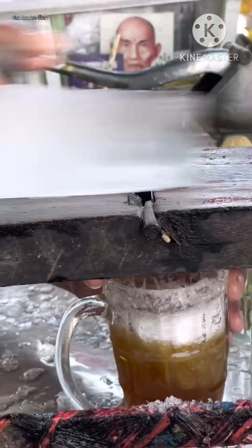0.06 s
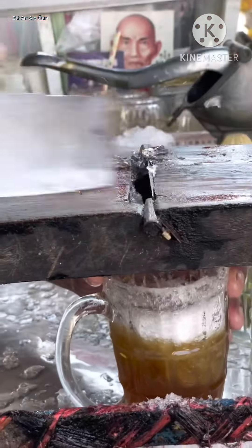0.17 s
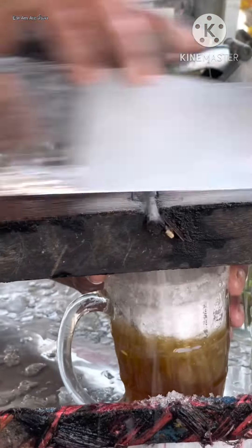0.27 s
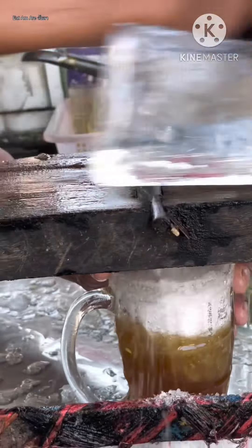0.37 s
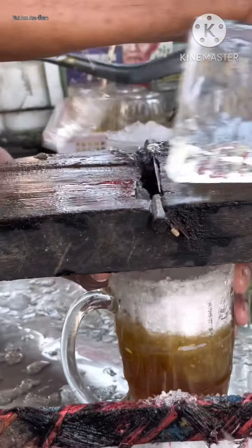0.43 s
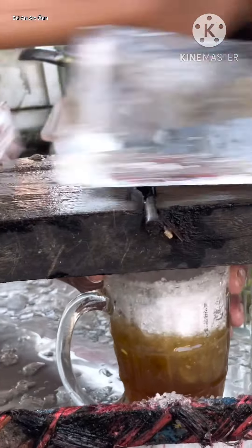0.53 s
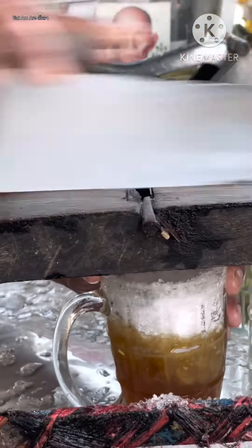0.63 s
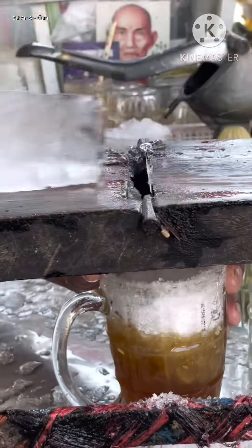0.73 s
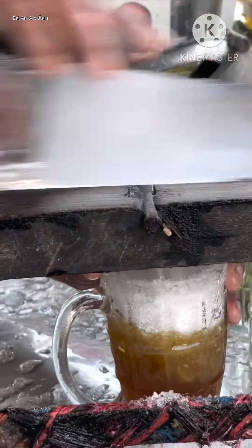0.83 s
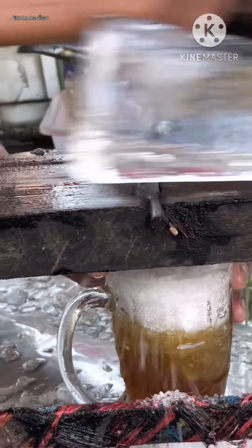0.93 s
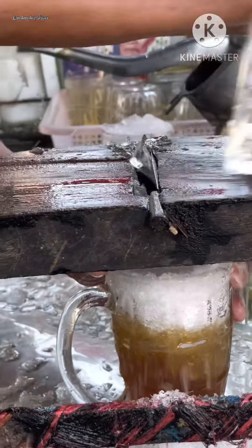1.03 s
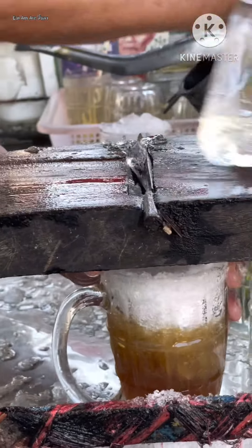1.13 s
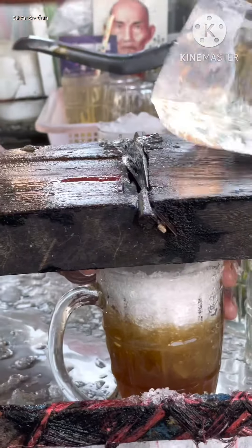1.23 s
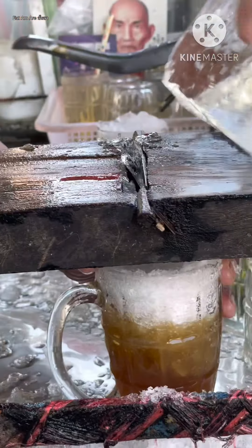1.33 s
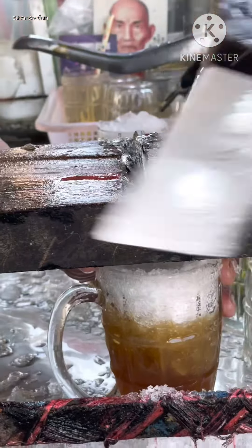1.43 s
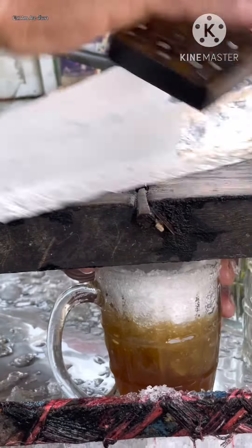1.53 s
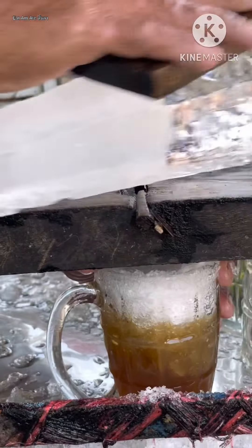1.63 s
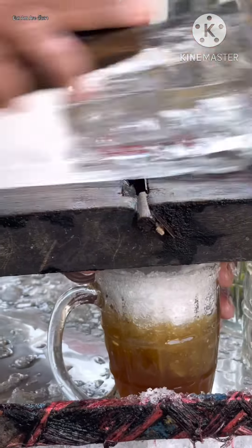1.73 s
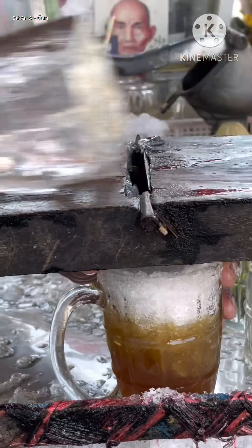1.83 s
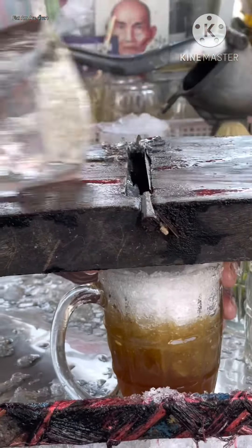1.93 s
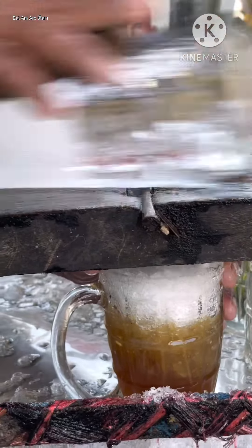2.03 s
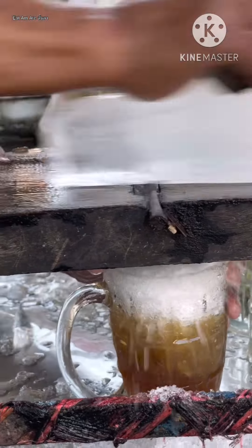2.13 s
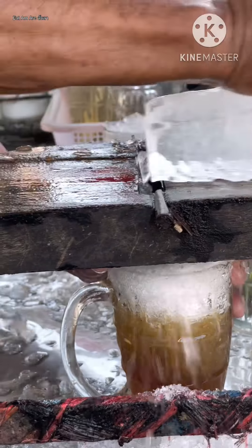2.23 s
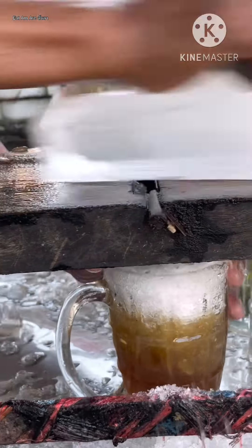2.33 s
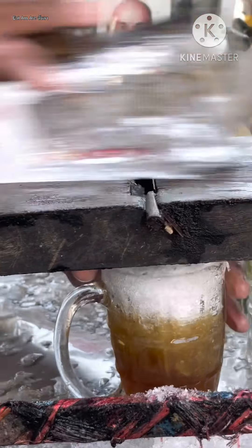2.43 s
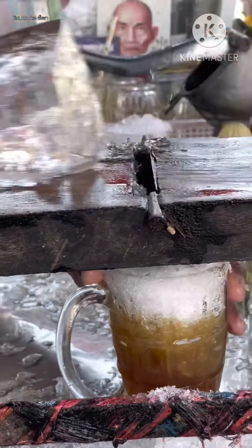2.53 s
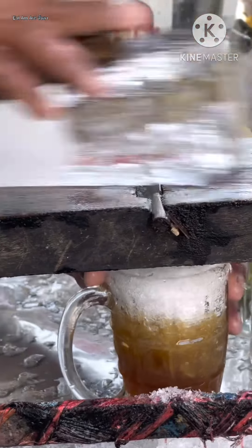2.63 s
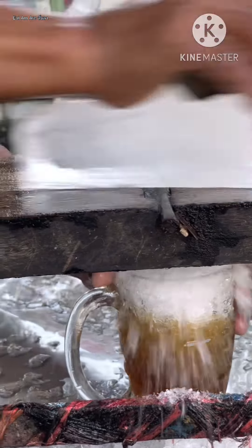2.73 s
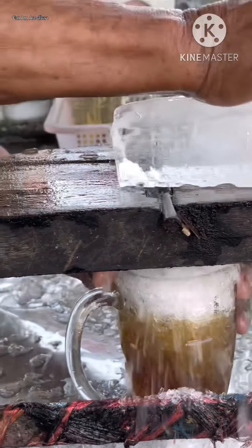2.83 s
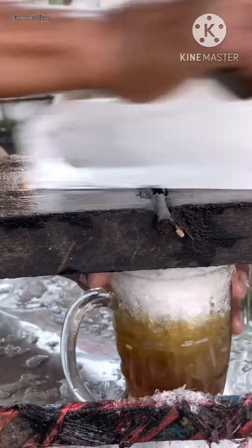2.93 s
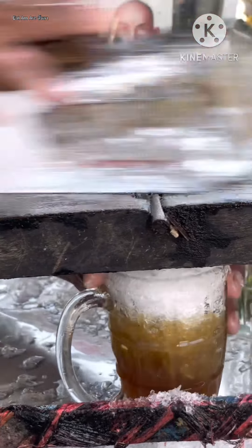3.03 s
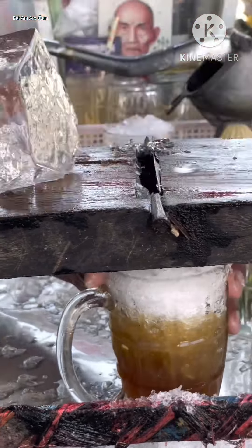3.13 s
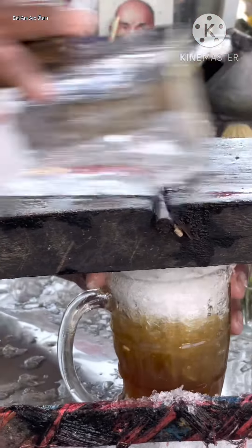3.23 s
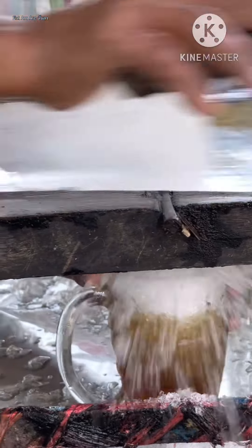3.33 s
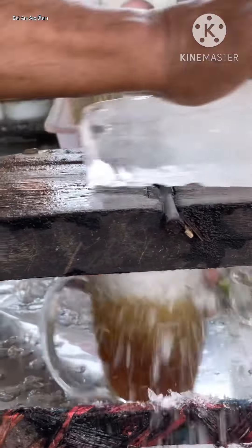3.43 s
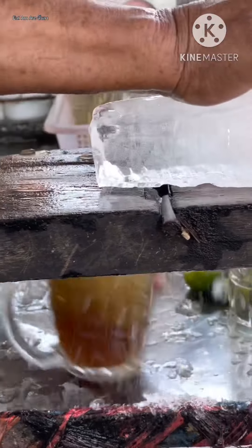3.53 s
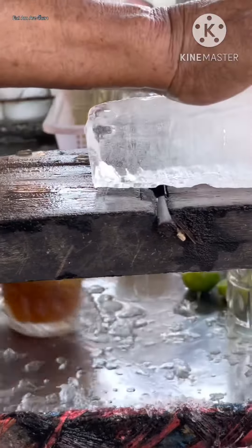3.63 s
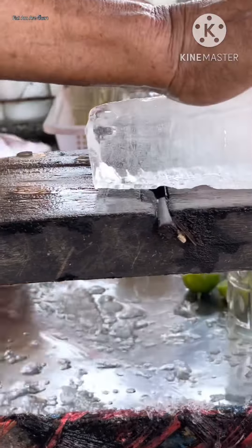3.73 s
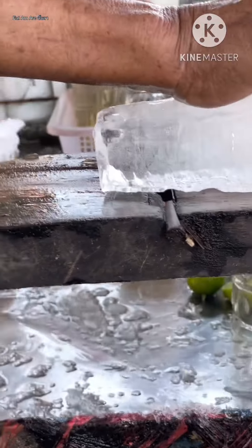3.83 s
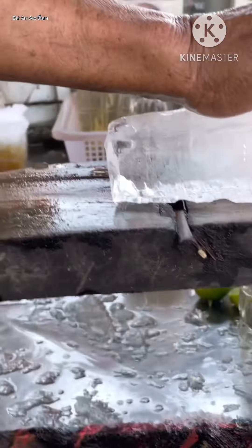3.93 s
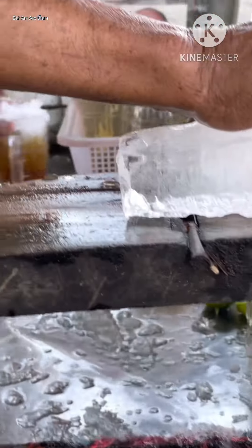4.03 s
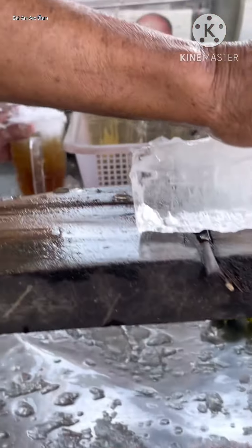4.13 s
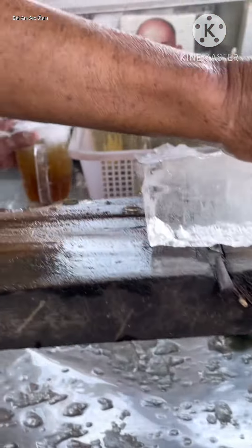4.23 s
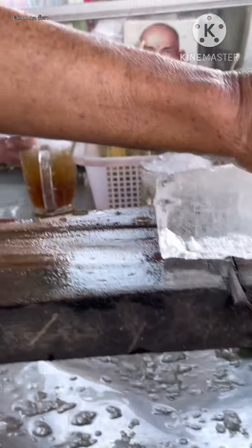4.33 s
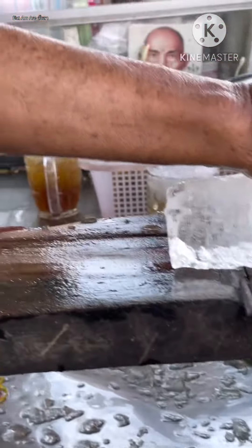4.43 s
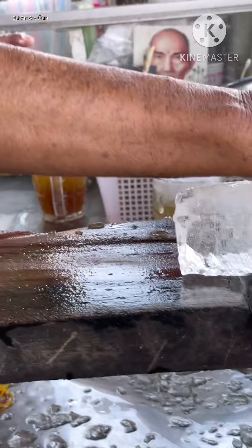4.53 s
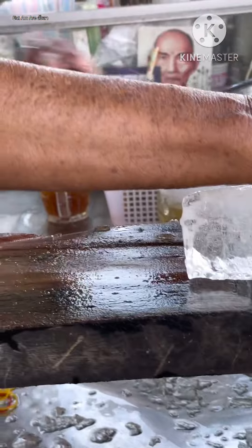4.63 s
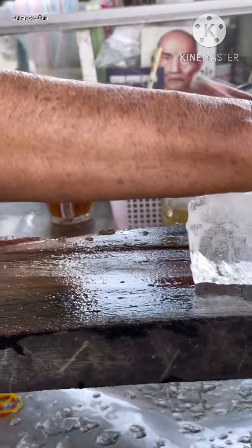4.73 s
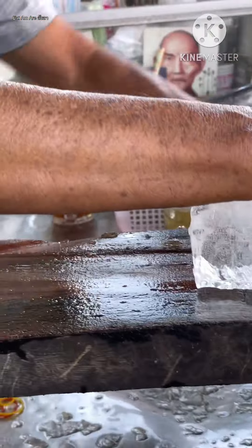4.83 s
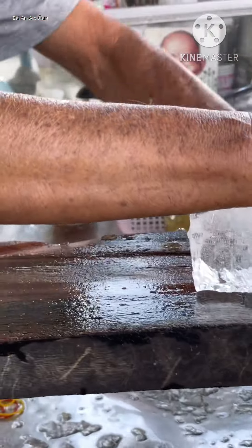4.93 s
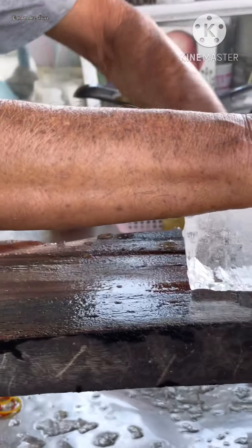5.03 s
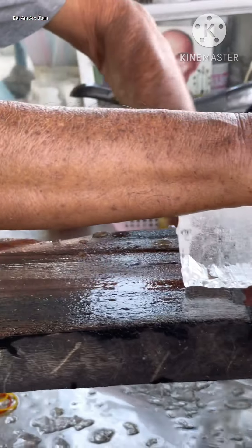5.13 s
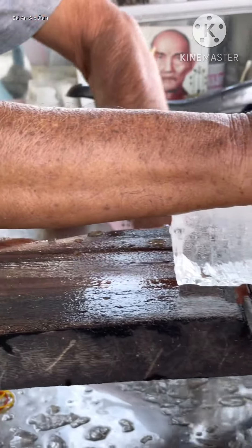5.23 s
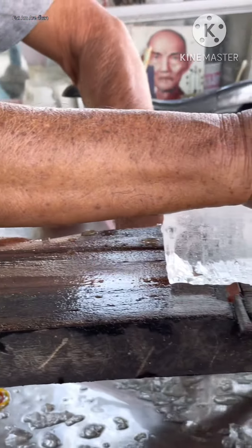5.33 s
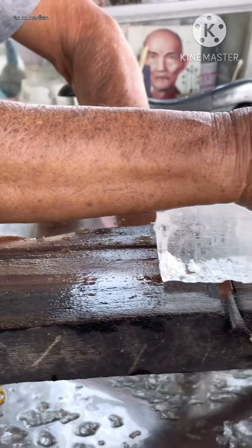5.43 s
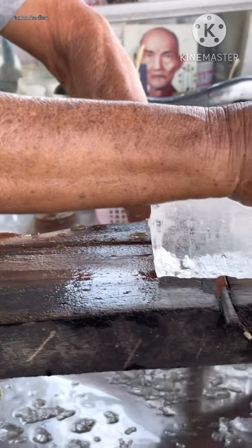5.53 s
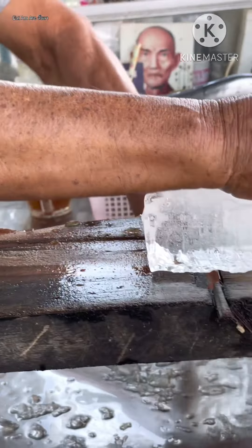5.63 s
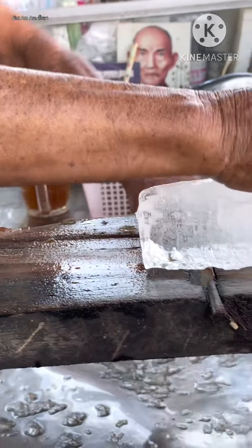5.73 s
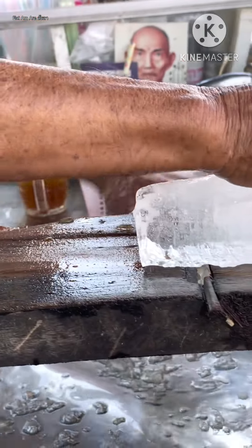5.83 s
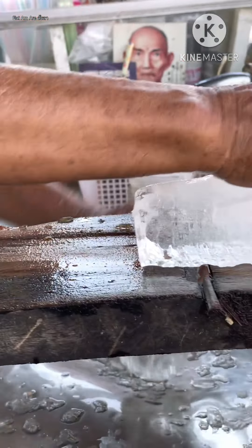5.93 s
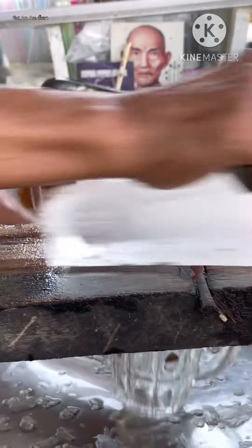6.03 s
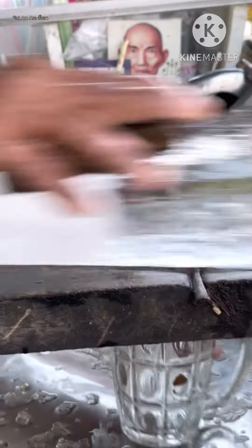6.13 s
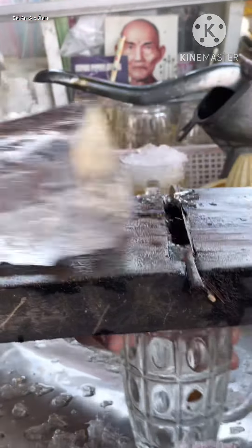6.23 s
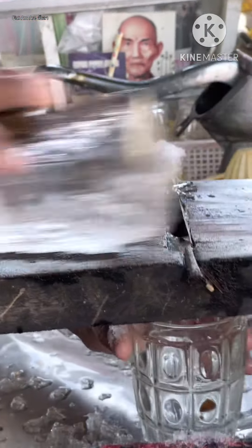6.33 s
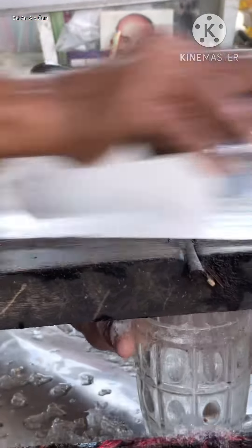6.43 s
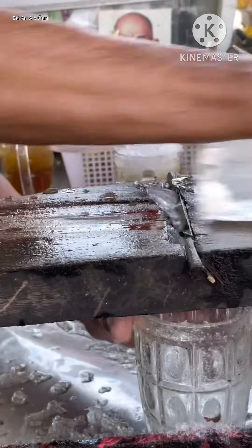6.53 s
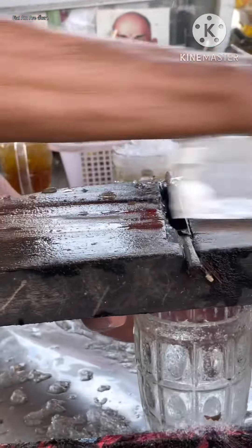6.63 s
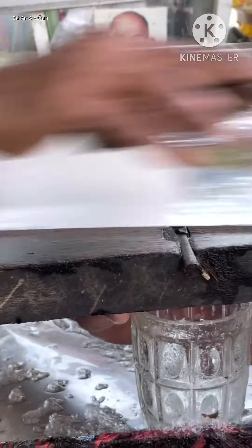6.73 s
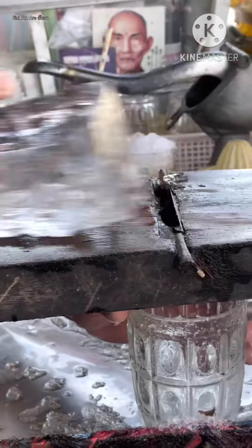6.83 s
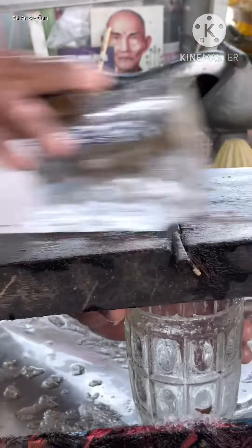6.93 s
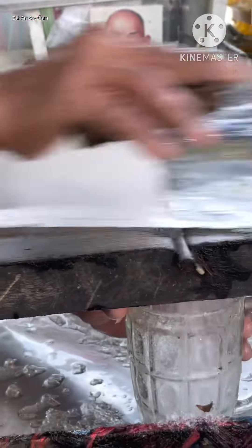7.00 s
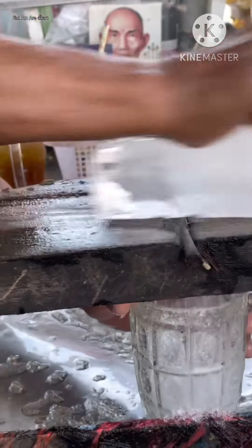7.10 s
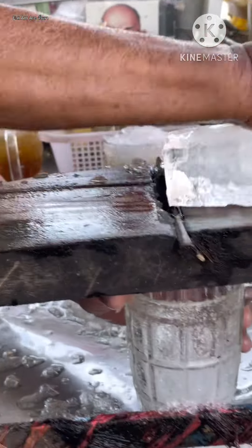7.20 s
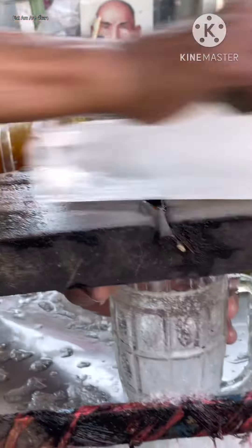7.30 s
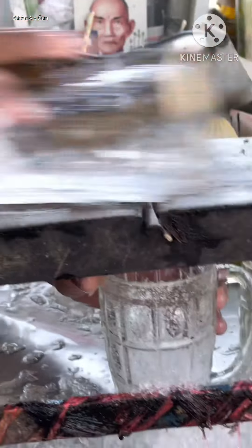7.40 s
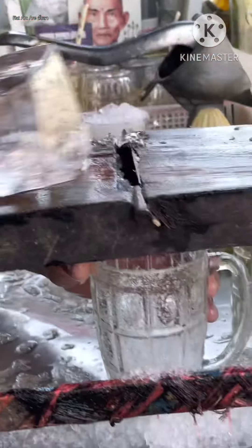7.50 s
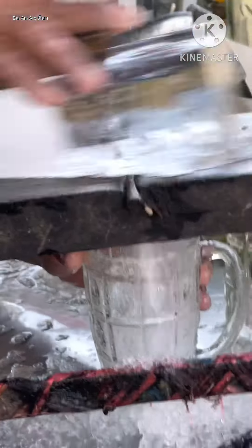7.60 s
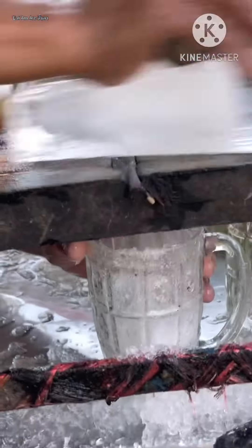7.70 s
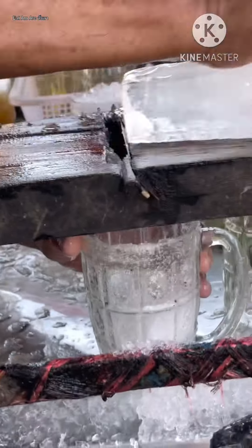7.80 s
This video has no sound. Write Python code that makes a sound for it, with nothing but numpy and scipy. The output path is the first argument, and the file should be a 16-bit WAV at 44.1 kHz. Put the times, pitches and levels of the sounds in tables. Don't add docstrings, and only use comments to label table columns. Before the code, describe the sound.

Very close at an open-air stall, a wet ice block knocks and scrapes over a wooden shaver. Five hard strokes tear off crackling, bright chips, with lighter return slides between. A pause follows with ticks, drips and faint glass touches over traffic hum. A slow motorbike thumps nearer, changes gear, and three more strokes rasp out. Stereo phone pickup, crisp treble, little echo.

```python
import sys
import numpy as np
from scipy import signal
from scipy.fft import rfft, irfft
from scipy.io import wavfile
from scipy.ndimage import uniform_filter1d

SR = 44100
rng = np.random.default_rng(int(sys.argv[2]) if len(sys.argv) > 2 else 0)


def gain_from_db(level_db):
    decades = np.asarray(level_db, float) / 20
    return 10 ** decades


def output_pcm(signal):
    pcm = np.clip(np.atleast_2d(signal).T, -1, 1) * 32767
    wavfile.write(sys.argv[1], SR, np.round(pcm).astype(np.int16))


N = 346626


def level(x, db):
    return x * gain_from_db(db) / np.sqrt(np.mean(x ** 2))


def curve(table):
    return gain_from_db(np.interp(np.arange(N) / SR, *np.transpose(table)))


def colour(x, table):
    hz, db = np.transpose(table)
    log_f = np.log(np.arange(N // 2 + 1) * SR / N + 1)
    below = np.clip(np.log(hz[0]) - log_f, 0, 3)
    return irfft(rfft(x) * gain_from_db(np.interp(log_f, np.log(hz), db) - 23 * below), N)


def ring(x, modes):
    out = 0
    for k, (hz, width, db) in enumerate(modes):
        b, a = signal.iirpeak(hz, hz / width, SR)
        out = out + (-1) ** k * gain_from_db(db) * signal.lfilter(b, a, x)
    return out


def walk(rate):
    hold = int(SR / rate)
    steps = np.repeat(rng.standard_normal(N // hold + 1), hold)
    return 1.14 * uniform_filter1d(uniform_filter1d(steps, hold), hold)[:N]


# (frequency [Hz], level [dB per Hz])
STREET_COLOUR = [(60, -17.5), (100, -14), (164, -8), (258, -12), (385, -15), (500, -22.5), (970, -40.5),
                 (2550, -51.5), (8500, -65), (12000, -70), (15500, -65.5)]
# (time [s], level [dB])
STREET_LEVEL = [
    (0, -44.5),
    (1.2, -50),
    (2.5, -45.5),
    (4, -44),
    (5, -46),
    (6, -37),
    (7.86, -36),
]


def street():
    noise, swell = colour(rng.standard_normal(N), STREET_COLOUR), walk(8.4)
    away_db = np.interp(np.arange(N) / SR, (2.5, 4), (0, -6))
    bands = 0
    for hz in 57 * 2 ** np.arange(0, 8.6, .5):
        band_db = 1.2 * swell + 2.2 * walk(9) + away_db * (hz < 1000)
        bands = bands + ring(noise, [(hz, hz / 3, 0)]) * gain_from_db(band_db)
    return level(bands, 0) * curve(STREET_LEVEL)


# (time [s], level [dB])
RUMBLE = [
    (0, -60),
    (1.7, -54),
    (3.3, -52.5),
    (5.5, -59.5),
    (6.6, -41.5),
    (7.2, -43.5),
    (7.86, -55.5),
]


def bench():
    t, pushed = np.arange(N) / SR, np.zeros(N)
    for s, length, *_ in CUTS:
        pushed += (t > s) * (t < s + length)
    pushed = uniform_filter1d(pushed, int(.04 * SR))
    shaking = ring(ring(rng.standard_normal(N), [(57.4, 56, 0)]), [(64.3, 65, 0)])
    return level(shaking, 0) * (curve(RUMBLE) + gain_from_db(-47.5) * pushed ** 2)


def contact(rows, rise, fall):
    t, out, extra_db = np.arange(N) / SR, np.full(N, -300.), np.zeros(N)
    for s, length, first, last, extra in rows:
        part = slice(max(int((s - .1) * SR), 0), int((s + length + .3) * SR))
        times, levels = (s - 1, s, s + length, s + length + 1), (first - rise, first, last, last - fall)
        db = np.interp(t[part], times, levels)
        extra_db[part] = np.where(db > out[part], extra, extra_db[part])
        out[part] = np.maximum(out[part], db)
    return out, extra_db


def gains(fizz_db, ring_db, board_db):
    return uniform_filter1d(gain_from_db(np.array([fizz_db, ring_db, board_db])), size=32)


def patchy(x, db):
    patches = signal.stft(x, nperseg=256)[2]
    shifts = uniform_filter1d(rng.standard_normal(patches.shape), size=5, axis=0)
    shifts = uniform_filter1d(shifts, size=4, axis=1)
    return signal.istft(patches * gain_from_db(db * shifts / shifts.std()), nperseg=256)[1][:N]


# (frequency [Hz], width [Hz], level [dB])
BLOCK = [(2460, 300, 2.5), (2812, 120, 7.5), (3053, 90, 5), (3275, 94, 7), (3534, 260, -1)]
BOARD = [(477, 41, 0), (622, 78, -2.5), (946, 190, -2), (1413, 200, 1.5), (1600, 433, -3), (2050, 150, -1)]
BLADE = [(4240, 110, -8), (5680, 150, 9), (5940, 90, -2), (7600, 160, 9.5)]


def rub(touch, fizz, chips_per_s, scatter_db, chatter_db, hiss_db, blade_db, patch_db):
    when, side, size = rng.random((3, N))
    chips = (when < chips_per_s / SR) * np.sign(side - .5) * gain_from_db(-scatter_db * np.log(size + .02))
    chatter = gain_from_db(chatter_db * (walk(300) + walk(110) + .7 * walk(45)))
    force = (level(chips, 0) + level(rng.standard_normal(N), hiss_db)) * chatter
    force = patchy(force, patch_db)
    blade = ring(force, BLADE)
    air = level(colour(force, fizz), 0) + level(blade, blade_db)
    parts = [level(air, 3.73), level(ring(force, BLOCK), 0.25), level(ring(force, BOARD), 0.083)]
    return np.sum(touch * parts, axis=0)


# (time [s], length [s], fizz at start [dB], fizz at end [dB], extra ring of block and board [dB])
SLIDES = [(0.019, .008, -44, -42, -1.5), (.048, .009, -39, -39, -1), (.074, .073, -33, -30, 0.5),
          (0.177, 0.01, -57, -34, 3), (0.611, .12, -43, -33, -1), (0.785, 0.0075, -37, -46, 4.5),
          (1.843, 0.072, -54, -44, -0.5), (2.403, 0.038, -47, -45.5, 1), (2.473, 0.063, -41.5, -38.5, 0),
          (2.571, 0.031, -41.5, -52, 5.5), (2.668, 0.018, -56.5, -54.5, 4.5), (3.025, 0.076, -56, -51, 5),
          (3.135, 0.041, -59.5, -36, 2.5), (3.512, 0.048, -48, -42.5, 1), (6.074, 0.096, -60.5, -47, 2),
          (6.172, 0.13, -43, -39.5, -1.5), (6.686, 0.096, -60, -56, 4.5), (6.787, 0.094, -44, -34, 3),
          (6.876, 0.052, -29.5, -37, 0), (7.354, 0.089, -57, -37.5, 3.5), (7.427, 0.059, -36.5, -41.5, 0),
          (7.523, 0.015, -44, -34.5, 0.5)]
# (time [s], length [s], fizz at start [dB], fizz at end [dB], extra ring of block and board [dB])
RUSTLE = [(1.179, 0.092, -68, -54, -0.5), (1.275, 0.033, -62, -58.5, 6), (1.333, 0.21, -65, -82.5, 2.5),
          (1.517, 0.081, -66, -75, -2.5), (1.615, 0.0071, -52, -58, 6.5), (1.69, 0.014, -54.5, -64.5, -3),
          (1.74, 0.076, -62.5, -58.5, -1.5), (1.945, 0.14, -69.5, -85, 8), (3.609, 0.13, -58.5, -71, 3),
          (3.765, .17, -54.5, -65, 3.5), (3.959, 0.2, -68.5, -71.5, 1.5), (4.196, 0.086, -74, -76, -6),
          (4.403, 0.018, -66, -75, -8.5), (4.558, 0.24, -77, -83.5, -5), (4.951, 0.031, -81.5, -49.5, 1.5),
          (5.005, 0.21, -69.5, -75.5, 2), (5.262, 0.15, -76.5, -76.5, -0.5), (5.684, 0.073, -80.5, -75, 0),
          (5.914, 0.026, -57, -76, -11), (2.608, .06, -63, -69.5, 2.5), (3.215, 0.12, -73, -64.5, 4),
          (6.338, 0.13, -75.5, -72, -2), (7.561, 0.062, -69, -68, 0)]
# (frequency [Hz], level [dB per Hz])
SLIDE_FIZZ = [(3000, -14), (4600, -5), (5200, -5), (5900, 1), (7000, 0), (9000, -4), (12000, -10),
              (14500, -4), (15700, -4)]


def sliding():
    trickle = [(s + length, .12, -56, -62.5, 0) for s, length, *_ in CUTS]
    settle = [(s + length, .12, -65.5, -74.5, 0) for s, length, *_ in SLIDES]
    db, body_db = contact(SLIDES + RUSTLE + trickle + settle, rise=2000, fall=900)
    lighter = -30 - db
    touch = gains(db, db + body_db - 9.5 + .2 * lighter, db + body_db - 6 + .27 * lighter)
    return rub(touch, SLIDE_FIZZ, 2000, scatter_db=4.2, chatter_db=1.8, hiss_db=-3, blade_db=-5, patch_db=2.4)


# (time [s], peak [dB], ring [Hz], crack over the ring [dB])
KNOCKS = [(0.051, -43, 945, -1), (0.0718, -32.5, 960, -13), (0.187, -29, 1030, -11.5),
          (0.303, -11.5, 3160, -11.5), (0.615, -38, 920, 8), (0.6464, -29.5, 2500, -12.5),
          (0.7852, -16.5, 1000, -14), (1.9205, -26.5, 870, -10.5), (2.0951, -24.5, 2580, 9),
          (2.4055, -37.5, 1490, -11.5), (2.4747, -25.5, 1426, -8.5), (2.577, -29.5, 2397, -5.5),
          (2.6938, -21.5, 2770, 9), (3.0479, -29, 909, -4.5), (3.1328, -34, 1040, 3.5),
          (3.1637, -33, 859, -1), (3.3212, -16, 1428, -1.5), (6.454, -34, 1660, 22.5),
          (6.775, -25.5, 1060, -29.5), (7.0266, -18, 1400, -7.5), (7.364, -29.5, 958, -12),
          (7.5259, -25, 1070, -6), (7.6175, -41, 1230, -10), (7.653, -15.5, 1540, 1.5)]
# (time [s], peak [dB], ring [Hz], crack over the ring [dB])
TICKS = [(1.28, -29, 2720, -11), (1.336, -40.5, 855, -19.5), (1.5127, -52.5, 1040, -2.5),
         (1.6167, -37, 950, -8.5), (1.692, -39, 2050, -12), (3.6161, -28, 1453, -13), (3.758, -38, 2330, 4),
         (3.775, -27, 1155, -14), (3.803, -27, 2280, -27), (3.846, -33.5, 900, -26),
         (3.902, -37.5, 2970, 2.5), (4.088, -30, 1167, -36), (4.235, -46.5, 2300, -14.5),
         (4.369, -43.5, 2220, -21), (4.408, -63.5, 855, -1), (4.563, -41, 2320, -15.5),
         (4.638, -50, 2190, -3.5), (4.7566, -54, 1450, -32), (4.953, -54.5, 1970, 4),
         (4.977, -29, 2830, -8), (5.268, -40, 3770, -29), (5.322, -45, 920, 7.5), (5.4594, -55, 877, -26),
         (5.912, -53, 870, 1), (3.288, -56, 1500, 8), (3.936, -54, 2000, 11.5), (4.0, -56.5, 2000, 11),
         (4.018, -59, 1990, 11), (2.638, -55, 2005, 5)]


def knocks():
    out, t = np.zeros(N + 4096), np.arange(4096) / SR
    for s, db, hz, crack_db in KNOCKS + TICKS:
        noise = rng.standard_normal(4096)
        ratios = np.array([1, 1.4, 2, 0.64, 1.6]) * (1 + 0.02 * rng.standard_normal(5))
        blow = noise * (np.exp(-t / 0.00053) + 0.078 * np.exp(-t / 0.022))
        modes = [(hz * r, hz * r * 0.14, d) for r, d in zip(ratios, (5.5, -2.5, -8.5, 2.5, -14.0))]
        body = ring(blow, modes)
        crack = np.diff(noise, prepend=0) * (np.exp(-t / .003) + 0.8 * np.exp(-t / 0.012))
        hit = 0.93 * body / np.abs(body).max() + gain_from_db(crack_db - 10.5) * crack
        out[int(s * SR):][:4096] += gain_from_db(db) * hit
    return out[:N]


# (time [s], level over the stroke [dB], half length [s])
CATCHES = [(0.3432, 1.5, 0.0025), (0.35, -0.5, 0.0045), (0.3991, 1, 0.0017), (0.405, 0.5, 0.0037),
           (0.449, 3.5, 0.0029), (0.455, 2, 0.0019), (0.48, 3.5, 0.0038), (0.4934, 7, 0.0026),
           (0.892, 5.5, 0.0013), (0.9707, 6, 0.0018), (0.9828, 3, 0.004), (1.021, 5, 0.004),
           (1.0503, 3.5, 0.004), (2.1292, 0.5, 0.0016), (2.139, -0.5, 0.0045), (2.16, 1, 0.0027),
           (2.179, -0.5, 0.0035), (2.191, 5, 0.0041), (2.2319, 3, 0.0037), (2.2625, 5, 0.0041),
           (2.296, 3.5, 0.0044), (2.308, 6.8, 0.0034), (2.713, 4.5, 0.0037), (2.728, 5, 0.0045),
           (2.761, 3, 0.0045), (2.77, 2, 0.0029), (2.865, 5, 0.003), (2.923, 6.5, 0.0026),
           (3.341, 5, 0.004), (3.358, 4, 0.0016), (3.361, 2, 0.002), (3.3813, 0.5, 0.0019),
           (3.4, 2.5, 0.0029), (3.4216, 6.5, 0.0023), (3.432, 6, 0.0045), (3.4571, 4.5, 0.0034),
           (3.482, 2.5, 0.0035), (3.4916, 6, 0.0023), (3.503, 8.5, 0.0031), (3.525, 3.5, 0.00065),
           (6.463, 8, 0.0037), (6.4853, 4.5, 0.004), (6.516, 4.5, 0.0031), (6.5341, 6.5, 0.0045),
           (6.548, 7.5, 0.0032), (6.609, 9.3, 0.0029), (7.0719, 2, 0.0052), (7.0813, 6.5, 0.0017),
           (7.114, 2.5, 0.0028), (7.128, 2.5, 0.0028), (7.1418, 2, 0.0045), (7.1767, 3.5, 0.005),
           (7.21, 4, 0.0045), (7.688, 4.5, 0.0014), (7.6894, 5.5, 0.0045), (7.7, 1, 0.0034),
           (7.7405, 2.5, 0.003), (7.7475, -2, 0.0022), (7.8, 3, 0.0045), (7.843, 1.5, 0.0025)]


def catches():
    db = np.full(N, -1.5)
    for s, swell_db, half in CATCHES:
        span = np.arange(int(s * SR) - 600, min(int(s * SR) + 600, N))
        db[span] += swell_db * np.exp(-((span / SR - s) / half) ** 2)
    return gain_from_db(db)


# (time [s], length [s], fizz of chips at the peak [dB], sag by the end [dB],
# ring of the block over fizz [dB])
CUTS = [
    (0.302, 0.18, -17, 6, -7),
    (0.883, 0.18, -16.5, 9.5, -7.5),
    (2.095, 0.2, -17, 11, -5),
    (2.695, 0.21, -16, 12, -8.5),
    (3.321, .19, -17.5, 15, -7),
    (6.454, 0.16, -19, 6, -8.5),
    (7.027, 0.24, -14, 15.5, -9),
    (7.652, 0.2, -17.5, 7, -10),
]
# (time to its peak [s], first bite relative to the peak [dB])
BITES = [
    (0.029, -1.5),
    (0.052, -12.5),
    (0.051, -16),
    (0.025, -7.5),
    (0.022, -5),
    (.02, -6.5),
    (0.036, -6.5),
    (0.022, 1),
]
# (frequency [Hz], level [dB per Hz])
CUT_FIZZ = [(3300, -14), (4200, -3), (5100, -4), (5800, -1), (7200, 1), (8300, -1), (9300, -4), (11000, -7),
            (12400, -7.5), (14700, -1), (15700, -2)]


def cutting():
    bites, runs = [], []
    for (dig, bite), (s, length, peak, sag, block_db) in zip(BITES, CUTS):
        bites.append((s, dig, peak + bite, peak, block_db - 1.5))
        runs.append((s + dig, length - dig, peak, peak - sag, block_db))
    db, block_db = contact(bites + runs, rise=6000, fall=900)
    block_db = uniform_filter1d(block_db, size=900)
    lighter = -30 - db
    touch = gains(db, db + block_db + 1.4 + .21 * lighter, db - 7 + .44 * lighter) * catches()
    return rub(touch, CUT_FIZZ, 3000, scatter_db=4.0, chatter_db=1.35, hiss_db=-5, blade_db=-9, patch_db=1.9)


# (time of the middle [s], length [s], frequency [Hz], level [dB])
SINGS = [(0.345, 0.021, 3260, -24.5), (0.351, 0.04, 2790, -27), (0.361, 0.068, 5570, -27),
         (0.375, 0.087, 5500, -28.5), (0.386, 0.058, 2840, -29.5), (0.429, 0.044, 6020, -27),
         (0.426, 0.058, 7200, -29.5), (0.438, 0.096, 5510, -25.5), (0.486, 0.026, 7110, -28),
         (0.476, 0.055, 3270, -30.5), (0.945, 0.034, 1480, -27.5), (0.954, 0.064, 2840, -24),
         (0.994, 0.079, 3090, -29.5), (1.036, 0.06, 3010, -28.5), (2.128, 0.037, 4390, -26.5),
         (2.147, 0.054, 3510, -25.5), (2.187, 0.065, 2905, -19), (2.191, 0.021, 7970, -27),
         (2.241, 0.038, 7810, -32), (2.256, 0.028, 7250, -31.5), (2.293, 0.025, 7260, -30.5),
         (2.726, 0.03, 7580, -28.5), (2.746, 0.057, 7670, -32), (2.748, 0.057, 2670, -28),
         (2.773, 0.072, 1550, -30.5), (3.353, 0.052, 7140, -29), (3.357, 0.051, 4360, -30),
         (3.351, 0.055, 7130, -31.5), (3.382, 0.057, 7340, -32.5), (3.426, 0.027, 4600, -28.5),
         (3.435, 0.026, 1405, -32), (6.481, 0.035, 7150, -28), (6.478, 0.041, 4490, -32.5),
         (6.472, 0.041, 4480, -30.5), (6.524, 0.051, 1480, -30), (6.551, 0.028, 3200, -28.5),
         (7.053, 0.057, 1380, -31), (7.063, 0.054, 6120, -28.5), (7.072, 0.025, 7530, -27.5),
         (7.076, 0.051, 2840, -29.5), (7.111, 0.035, 4620, -26.5), (7.118, 0.064, 6370, -29.5),
         (7.146, 0.082, 1484, -29.5), (7.68, 0.039, 6010, -23), (7.665, 0.03, 1550, -29),
         (7.684, 0.037, 4500, -28.5), (7.673, 0.058, 6340, -28.5), (7.713, 0.084, 5940, -28.5),
         (7.747, 0.041, 5430, -27.5), (7.74, 0.049, 1623, -27),
         (.62, 0.023, 5900, -41), (0.67, .05, 5510, -40.5), (0.71, .05, 3010, -35.5),
               (.73, 0.057, 5810, -38.5), (.8, .04, 5840, -52.5), (3.55, 0.066, 3000, -43),
               (6.753, 0.017, 2670, -54), (6.863, .06, 2750, -34), (6.863, 0.08, 5900, -40),
               (6.85, .05, 7160, -37.5), (6.945, 0.024, 4900, -52), (7.018, 0.013, 5000, -45),
               (.33, .05, 1450, -30), (.45, .06, 1500, -32), (6.62, .06, 690, -35), (6.6, .04, 930, -35),
               (3.62, .04, 600, -42), (7.5, .1, 620, -42), (3.1, 0.11, 630, -44.5),
               (7.265, 0.036, 2500, -35.5), (7.265, .04, 4200, -38), (2.74, .08, 2000, -31),
               (7.37, 0.031, 5900, -49), (7.45, 0.078, 5820, -42.5), (7.54, .03, 6650, -37)]


def singing():
    out, grip = np.zeros(N + 8192), catches() * gain_from_db(2.0 * walk(350))
    width_hz, stretch = 190, 1.6
    for s, length, hz, db in SINGS:
        n = int(stretch * length * SR)
        tone = ring(rng.standard_normal(8192), [(hz, width_hz, 0)])
        tone = ring(tone, [(hz, 2.5 * width_hz, 0)])[-n:]
        tone = tone / (uniform_filter1d(np.abs(tone), size=150) + .2 * np.abs(tone).mean())
        out[int(s * SR) - n // 2:][:n] += level(tone, db - 1) * np.hanning(n)
    return out[:N] * grip


# (time [s], firings per second [Hz], exhaust level [dB])
BIKE = [(1.199, 24.2, -52.5), (2.849, 25.2, -41.5), (3.458, 25.9, -39.5), (4.098, 26.7, -40),
        (4.999, 27.7, -38), (5.998, 28.7, -35), (6.28, 29.1, -32.5), (6.77, 29.5, -29.5),
        (6.84, 28.3, -35.5), (7.05, 22.8, -44), (7.198, 24.6, -40), (7.27, 25.2, -38), (7.36, 24.2, -31),
        (7.619, 23.3, -32), (7.86, 23.8, -37.5)]
# (frequency [Hz], width [Hz], level [dB])
SILENCER = [(170, 72, 0)]
EXHAUST = [(260, 50, -4), (333, 45, 0), (450, 68, -8)]


def bike():
    s, hz, db = np.transpose(BIKE)
    t = np.arange(N) / SR
    turns = np.cumsum(np.interp(t, s, hz) * (1 + .003 * walk(25))) / SR + .8
    cycle, phase = turns.astype(int), turns % 1
    puffs = np.diff(cycle, prepend=0) * gain_from_db(1.2 * rng.standard_normal(400))[cycle]
    silencer = ring(ring(ring(puffs, SILENCER), SILENCER), SILENCER)
    pipe = ring(ring(puffs, EXHAUST), [(350, 200, 0)])
    thump = level(silencer, 0) + level(pipe, -12)
    boom = ring(ring(puffs, [(125.5, 20, 0)]), [(114, 90, 0)])
    hiss = ring(rng.standard_normal(N), [(453.6, 300, -18.0), (1500, 560, -19.5), (2450, 720, -20.5)])
    gas = np.exp(-phase / .5) * hiss
    coasting = uniform_filter1d(1. * (t > 6.8) * (t < 7.24), int(.046 * SR))
    boom_db = -13.5 + 15 * coasting
    engine = level(thump, 0) - level(boom, 0) * gain_from_db(boom_db) + level(gas, -32.5)
    return engine * gain_from_db(np.interp(t, s, db)) * np.clip((t - s[0]) / 2.1, 0, 1)


# (time [s], frequency [Hz], level [dB], time to fade by 60 dB [s])
CLINKS = [(1.928, 452, -28.5, 0.056), (4.64, 3450, -68, 0.25), (4.75, 3460, -68, 0.17),
          (4.982, 2830, -56, 0.16), (5.165, 3380, -67, 0.45), (5.178, 5700, -64, 0.18),
          (5.179, 7110, -64, 0.15), (5.18, 8510, -57.5, 0.16), (5.18, 4850, -64.5, 0.12),
          (6.305, 657, -32.5, 0.14), (7.636, 5030, -36, 0.077)]


def clinks():
    out, t = np.zeros(N + 4096), np.arange(4096) / SR
    for s, hz, db, t60 in CLINKS:
        tone = np.sin(2 * np.pi * hz * t) * np.exp(-np.log(1000) * t / t60)
        out[int(s * SR):][:4096] += gain_from_db(db) * tone * np.minimum(40 * (t[-1] - t), 1)
    return out[:N]


def stall(x, t60_s, wet_db):
    t = np.arange(8192) / SR
    tail = rng.standard_normal(8192) * np.exp(-np.log(1000) * t / t60_s) * (t > .002)
    return x + gain_from_db(wet_db) * signal.fftconvolve(x, tail / np.sqrt(np.sum(tail ** 2)))[:N]


def scene():
    far = street() + bench() + bike()
    near = stall(sliding() + knocks() + cutting() + singing() + clinks(), .1, -15)
    return np.tile(near + far, (2, 1))


def loosen(x, radians):
    patches = signal.stft(x, nperseg=256)[2]
    turned = patches * np.exp(1j * radians * rng.standard_normal(patches.shape))
    return signal.istft(turned, nperseg=256)[1][:N]


# (frequency [Hz], lead [radians])
PORTS = [(2000, 0), (2750, .3), (3800, .25), (4820, 1.3), (5450, .05), (6200, .85), (7235, 1.57),
         (8960, 2.55), (9150, np.pi), (11150, np.pi), (11400, 3.8), (12400, 4.6), (14100, 5.45),
         (14800, 2 * np.pi)]
# (from [Hz], to [Hz], lean towards silence [no unit])
EDGES = [(8400, 8800, -1), (8800, 9300, 1), (11000, 11500, 1), (11500, 11900, 0)]


def two_ports(x):
    f = np.arange(N // 2 + 1) * SR / N
    half = np.interp(f, *np.transpose(PORTS)) / 2
    treble_cut = np.clip((15800 - f) / 300 + .5, 0, 1) ** 2
    bass_cut = f ** 2 / (f ** 2 + 45 ** 2)
    heard = rfft(np.tanh(1.3 * x) / 1.3) * treble_cut * bass_cut
    mid = irfft(heard * np.cos(half), N)
    bass = gain_from_db(-17) / (1 + (f / 1150) ** 4) * f / (f + 50)
    side = irfft(heard * 1j * (np.sin(half) + bass), N)
    side = 1.3 * loosen(side, .95)
    loud = np.clip(uniform_filter1d(np.abs(side), size=900) / .012, 0, 1)
    leak_db = np.minimum(-21 + 8 * walk(35) - 10 * loud, -13)
    mid = mid + loosen(side, np.pi) * gain_from_db(leak_db)
    for lo, hi, lean in EDGES:
        edge = np.clip((f - lo) / 160 + .5, 0, 1) * np.clip((hi - f) / 160 + .5, 0, 1)
        mid = mid - irfft(heard * np.cos(half) * edge, N) * np.clip(4 * walk(30) + lean, 0, 1)
    return np.array([mid + side, mid - side])


def low_pass(x):
    return signal.sosfilt(signal.butter(12, 17050, fs=SR, output="sos"), x)


def record(dry):
    mix = two_ports(dry[0])
    return low_pass(mix)


dry = scene()
out = record(dry)
output_pcm(out)
```